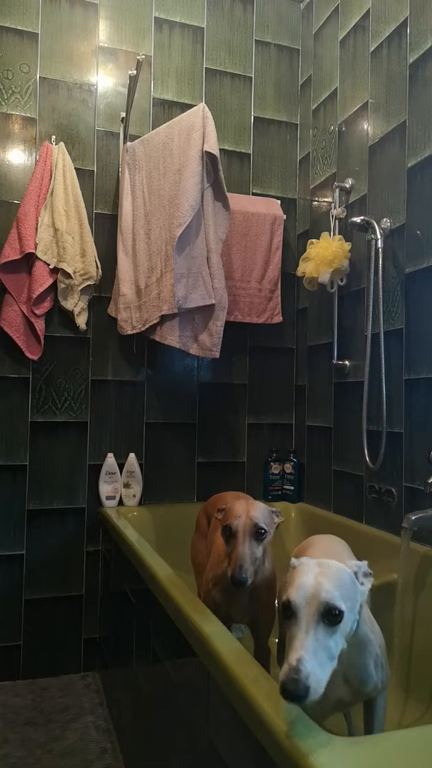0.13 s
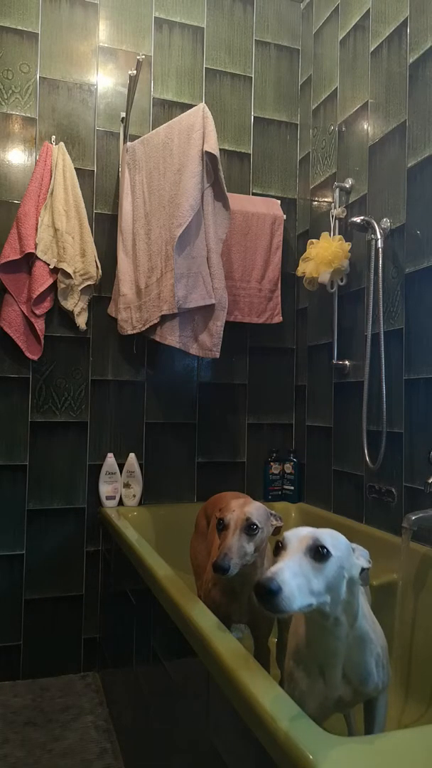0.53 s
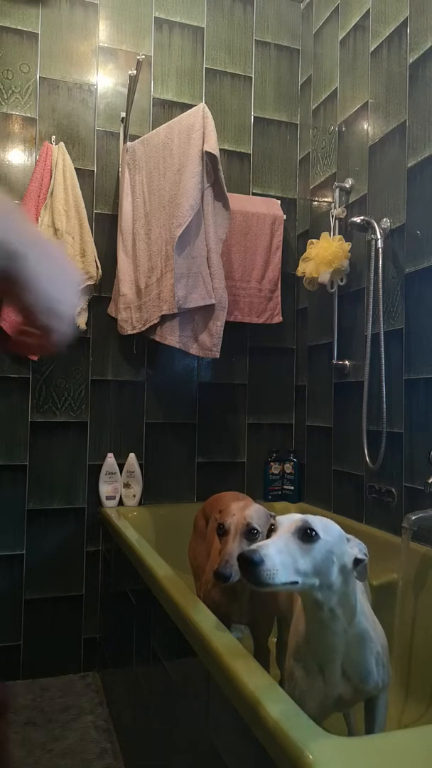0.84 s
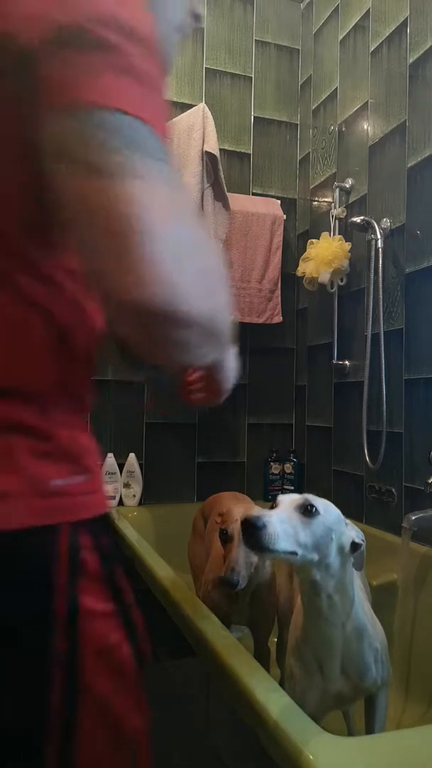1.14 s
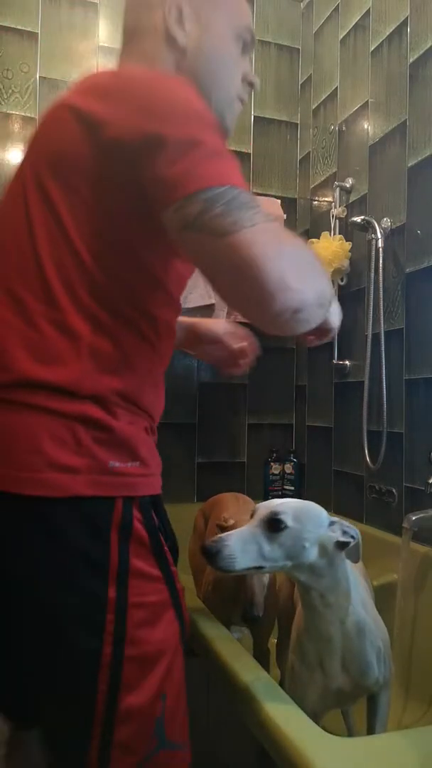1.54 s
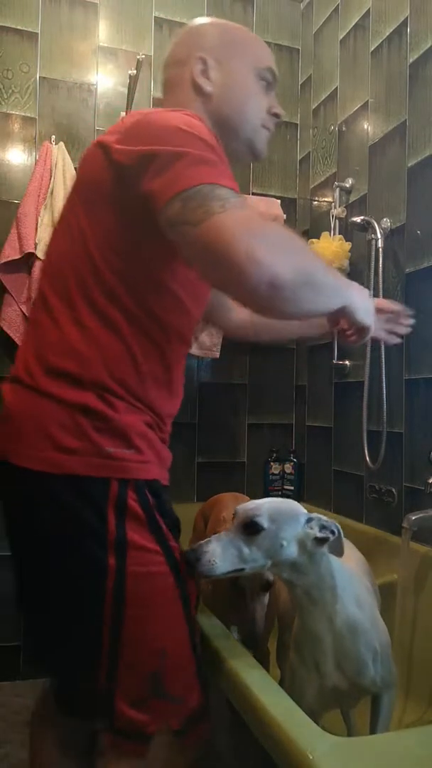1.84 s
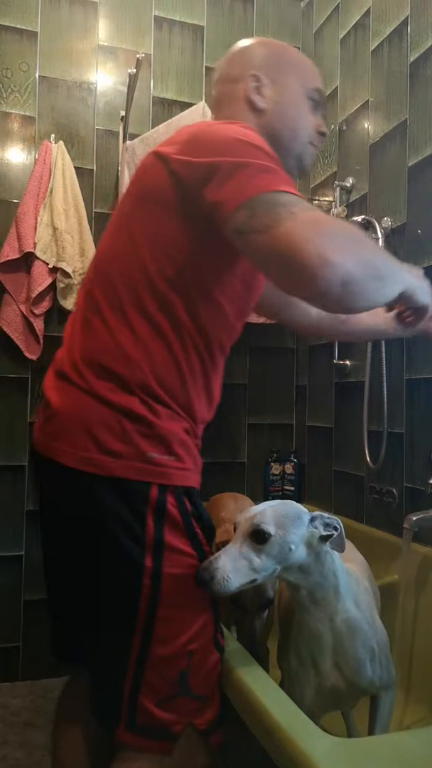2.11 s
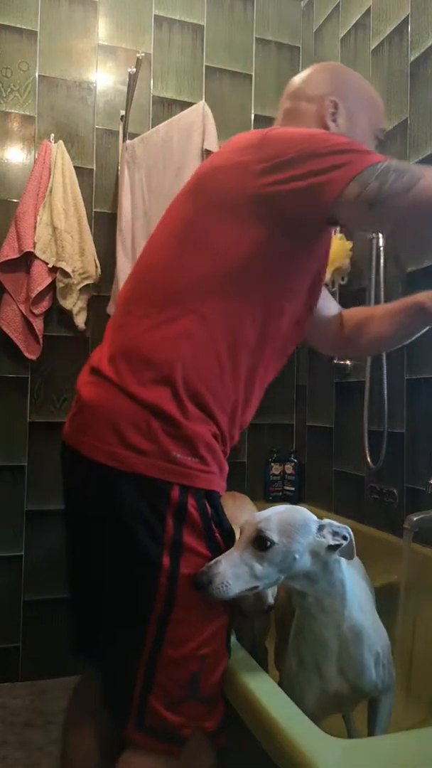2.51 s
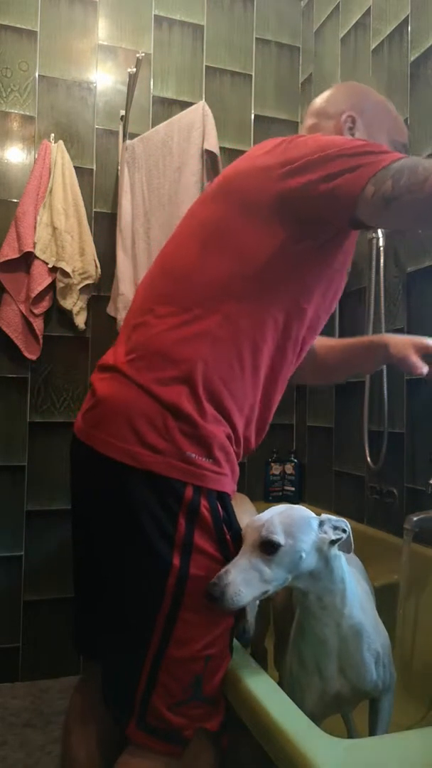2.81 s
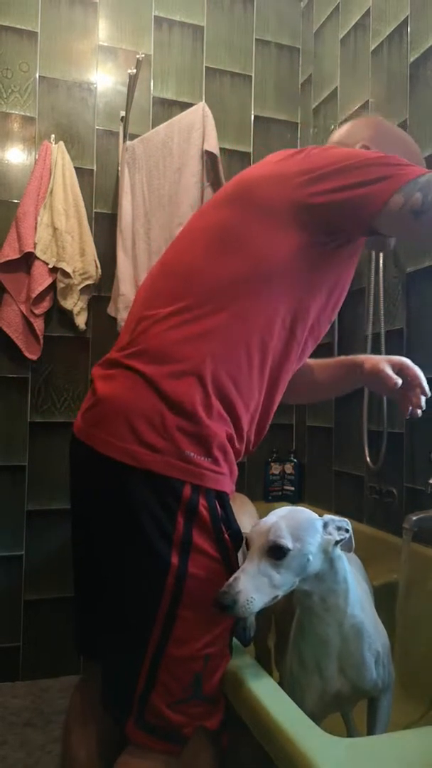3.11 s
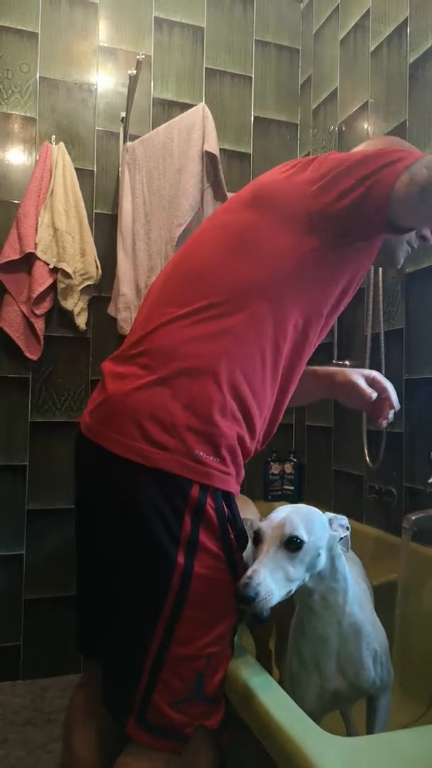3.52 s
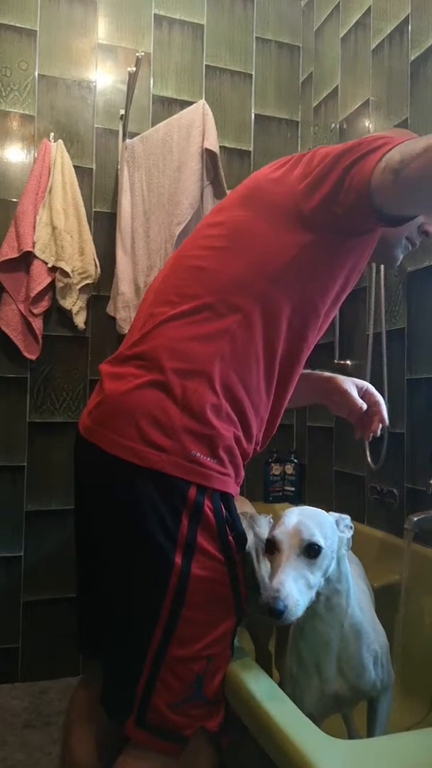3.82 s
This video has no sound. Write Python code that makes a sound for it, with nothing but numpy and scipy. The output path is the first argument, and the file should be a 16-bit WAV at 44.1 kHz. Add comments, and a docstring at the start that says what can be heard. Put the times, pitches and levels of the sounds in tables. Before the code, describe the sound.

A broken stream of tap water splashes into a tub throughout, crackling with bright droplets and uneven slaps, a soft low rumble beneath; short hard-tiled room reflections, heard nearby on a phone's stereo microphones.

```python
"""Tap running into a bathtub

Small tiled bathroom. The broken stream hisses (shaped noise), churns the pool (noise following
a level curve) and drums the tub's low modes (resonant noise). Slaps, spatters, sharp clicks and
stray drops are damped sines rising in pitch, singly or in crowds, coloured by the tub wall. The
tiles answer with decaying noise; a faint low hum lies beneath. A phone's two ports hear it.
"""
import sys
import numpy as np
from scipy import signal
from scipy.fft import rfft, irfft, next_fast_len
from scipy.io import wavfile
from scipy.ndimage import uniform_filter1d, map_coordinates

SR = 44100
rng = np.random.default_rng(int(sys.argv[2]) if len(sys.argv) > 2 else 0)


def natural_amplitude(level_db):
    """Convert a level in decibels to a linear amplitude factor, elementwise."""
    exponent = np.asarray(level_db, float) / 20
    return 10 ** exponent


def wav_record(signal):
    """Record a signal, one row per channel, as 16-bit PCM in the file named by sys.argv[1]."""
    frames = np.transpose(np.atleast_2d(signal))
    bounded = np.clip(frames, -1, 1)
    # unit amplitude maps onto the largest positive 16-bit level
    quanta = np.round(bounded * 32767).astype(np.int16)
    wavfile.write(sys.argv[1], SR, quanta)


N = 174195

# Levels in the source tables are before each layer's trim; spectra set shape only.
# spray off the stream: (time [s], level [dB])
SPRAY_LEVEL = [(0.0, -40.5), (0.3, -40.5), (0.62, -43.5), (0.85, -41.5), (1.34, -42.5), (1.5, -42.5),
               (2.13, -43.5), (2.28, -42), (2.8, -44), (2.93, -44), (3.72, -42.5), (3.95, -42)]
# churning of the pool: (time [s], level [dB])
CHURN_LEVEL = [(0.0, -48.5), (0.01, -54), (0.16, -50.5), (0.21, -45.5), (0.25, -49), (0.32, -51.5),
               (0.4, -54), (0.45, -47), (0.52, -51), (0.73, -51), (0.8, -53.5), (0.84, -51), (1.05, -52.5),
               (1.17, -59), (1.31, -56.5), (1.34, -57), (1.43, -50), (1.48, -55), (1.51, -44.5),
               (1.56, -52), (1.58, -46.5), (1.64, -47), (1.66, -52), (1.72, -46), (1.79, -49),
               (1.99, -52.5), (2.01, -48.5), (2.25, -51.5), (2.29, -62), (2.49, -55), (2.54, -53),
               (2.6, -60.5), (2.71, -62.5), (2.78, -54), (2.79, -55.5), (2.91, -49), (2.935, -47.5),
               (3.0, -52.5), (3.12, -52), (3.13, -56), (3.27, -47.5), (3.6, -54), (3.65, -49),
               (3.84, -55.5), (3.93, -51), (3.95, -52)]
# push of the stream on the tub floor: (time [s], level [dB])
DRUM_LEVEL = [(0.0, -38.5), (0.05, -45), (1.61, -45), (1.65, -54), (1.73, -41), (2.36, -50.5),
              (2.54, -41.5), (2.78, -54), (2.79, -46.5), (3.41, -38), (3.5, -45), (3.53, -36.5),
              (3.85, -42.5), (3.95, -45)]
# slaps on the pool: (time [s], level [dB], centre pitch [Hz], left-right [dB], length scale [s])
SLAPS = [(0.05, -28.5, 2630, 2, 0.02), (0.139, -29, 3660, 5, 0.015), (0.172, -29, 2400, -7, 0.048),
         (0.251, -33, 1750, -5, 0.018), (0.304, -27.5, 1860, -0.5, 0.021), (0.341, -32, 2300, 0, 0.019),
         (0.4455, -27, 2800, 3, 0.04), (0.507, -24, 3580, 0, 0.0062), (0.801, -28, 3870, 3, 0.017),
         (0.963, -27, 4360, 2, 0.021), (1.134, -28, 4660, 1, 0.022), (1.3356, -25, 3210, 1.0, 0.04),
         (1.376, -26.5, 4020, 4, 0.022), (1.4065, -21.5, 3850, 1.5, 0.019), (1.4394, -32, 4220, -2, 0.018),
         (1.485, -24.5, 5100, 2, 0.025), (1.57, -31.5, 2400, -2, 0.018), (1.6801, -34, 1700, 2, 0.021),
         (1.732, -36.5, 2210, -5, 0.016), (1.791, -23.5, 4550, 0, 0.033), (1.8248, -28.5, 1860, -1, 0.02),
         (1.925, -23, 2510, -2, 0.019), (1.9566, -23, 3440, 2, 0.02), (1.997, -30.5, 1880, -4, 0.025),
         (2.0777, -33.5, 2360, 3, 0.024), (2.1245, -24, 4000, 1, 0.014), (2.253, -30, 4270, 3, 0.022),
         (2.291, -35.5, 3440, 2, 0.025), (2.523, -22.5, 2320, -3.5, 0.032), (2.567, -43, 2300, 3, 0.026),
         (2.7864, -24.5, 2000, -4, 0.018), (2.9265, -22.5, 2070, 0, 0.023), (3.03, -31.5, 2210, -1, 0.019),
         (3.0894, -25.5, 3680, -2, 0.017), (3.178, -36, 2330, 5, 0.026), (3.212, -24.5, 4070, -0.5, 0.018),
         (3.258, -28, 1880, -6, 0.017), (3.3043, -24, 2400, -0.5, 0.02), (3.655, -29, 4600, 3, 0.035),
         (3.705, -22.5, 3270, 0, 0.021), (3.7453, -22, 2840, 4, 0.019), (3.941, -25, 2400, 6, 0.03)]
# spatters of fine drops: (time [s], level [dB], centre pitch [Hz], left-right [dB], length scale [s])
SPATTERS = [(0.3044, -21, 6350, -3.0, 0.023), (0.41, -27.5, 9100, -4, 0.038),
            (0.565, -23.5, 7600, 6, 0.018), (0.791, -29, 7800, -3, 0.025), (0.87, -25, 7540, 2, 0.036),
            (0.974, -25.5, 9300, 2, 0.012), (1.315, -28, 6900, 1, 0.024), (1.37, -27, 7600, 11, 0.035),
            (1.407, -24, 7100, 1, 0.029), (1.4972, -32, 8100, 12, 0.02), (1.618, -28, 9400, 4, 0.019),
            (1.791, -25.5, 7550, 10, 0.023), (1.922, -29, 8650, 0, 0.017), (2.054, -24.5, 7400, 9, 0.019),
            (2.099, -19, 6200, 1.5, 0.016), (2.438, -24.5, 6400, -1, 0.028), (2.498, -28, 5640, 1, 0.047),
            (2.6019, -25.5, 7500, 3, 0.015), (2.7871, -25, 5720, 1, 0.015), (2.837, -31, 6900, 0, 0.023),
            (2.907, -27, 7300, 4, 0.022), (3.022, -26, 8550, 7, 0.019), (3.068, -24, 5600, -3, 0.03),
            (3.206, -27, 7600, 1, 0.023), (3.49, -21, 7860, 3, 0.046), (3.71, -24.5, 7800, 6, 0.029),
            (3.852, -32, 7700, 7, 0.045)]
# sharp broad ticks, some alone, some at the onset of a slap or spatter: (time [s], peak [dB], pitch [Hz])
CLICKS = [(0.0165, -18, 9000), (0.0545, -18.5, 3500), (0.3148, -19, 8550), (0.9838, -24, 10000),
          (1.321, -23, 7000), (1.382, -26, 4200), (1.4118, -24, 9000), (1.491, -24, 6000),
          (1.7909, -24, 11000), (2.2065, -17, 9000), (2.7403, -25, 9000), (2.7873, -26.5, 2200),
          (2.9055, -22, 5960), (2.9273, -17, 1960), (3.032, -25, 11000), (3.2107, -30, 10000)]
# spray spectrum: (frequency [Hz], relative density [dB per Hz])
SPRAY_SPECTRUM = [(1760, -12.5), (3000, -28), (3980, -10), (5790, 3.5), (6240, -0.5), (7570, 0.5),
                  (8430, -1), (9140, 1.5), (11100, -3), (13300, -13.5), (14900, -20.5)]
# pool spectrum: (frequency [Hz], relative density [dB per Hz])
POOL_SPECTRUM = [(130, -7.5), (220, -4), (301, -12), (434, -10), (556, -12), (686, -7), (761, -6.5),
                 (2310, -13.5), (3400, -11), (5000, -9), (6500, -66), (11000, -120)]
# rumble spectrum: (frequency [Hz], relative density [dB per Hz])
RUMBLE_SPECTRUM = [(12, -37), (20, -6), (43, -1), (102, 12.5), (182, 3), (204, -9), (300, -30.5),
                   (390, -62), (660, -120)]
# low modes of the tub: (centre [Hz], width [Hz], relative level [dB])
TUB_MODES = [(95.7, 31.4, -6.5), (127.7, 10.1, 0.5), (175.9, 10.6, 3), (205.2, 10.1, -3), (460, 95, -22.5)]
# ring of the enamel wall: (centre [Hz], width [Hz], boost [dB])
TUB_WALL = (2274, 114, 2.1)
# decay of the tiled room: (frequency [Hz], t60 [s])
TILE_DECAY = [(300, 0.2), (2000, 0.26), (6000, 0.12), (12000, 0.12)]
# likeness of the two ports' noise, lag aside: (frequency [Hz], correlation [-1..1])
PORT_LIKENESS = [(60, 1), (250, 0.95), (450, 0.83), (750, 0.67), (1300, 0.23), (2500, 0.16), (14000, 0.1)]
# balance of the two ports: (frequency [Hz], left-right [dB])
PORT_LEAN = [(200, 0), (370, 0.5), (690, -3), (1260, -4), (2320, -2.5), (4280, 0.5), (7870, -5.5),
             (14500, -14)]
# resonances of the left port: (centre [Hz], width [Hz], boost [dB])
LEFT_PORT = [(2400, 550, 4), (5800, 130, 6.5), (7600, 1230, 7.5)]
# resonances of the right port: (centre [Hz], width [Hz], boost [dB])
RIGHT_PORT = [(2350, 136, 5.5), (9170, 330, 3), (10910, 390, 5)]

LEFT_LAG_MAX_S = 0.00062  # the tub is nearer the right port
BASS_LAG_SHARE, LAG_TURN_HZ = 0.36, 504  # the bass wraps round the phone with less lag


def unit(x):
    """Scale to rms 1."""
    return x / np.sqrt(np.mean(x ** 2) + 1e-20)


def along(points, hz):
    """Read (Hz, value) points on a log-frequency axis."""
    point_hz, value = np.transpose(points)
    return np.interp(np.log(hz + 1), np.log(point_hz + 1), value)


def curve(points):
    """Interpolate (s, value) points to one value per sample."""
    time_s, value = np.transpose(points)
    return np.interp(np.arange(N) / SR, time_s, value)


def wobble(knots_per_s):
    """Smooth random curve through Gaussian knots."""
    knots = rng.standard_normal(int(N * knots_per_s / SR) + 4)
    return map_coordinates(knots, [np.arange(N) * knots_per_s / SR])


def filtered(x, response):
    """Multiply the spectrum of x by a function of frequency."""
    size = next_fast_len(N + SR // 2)
    return irfft(rfft(x, size) * response(np.fft.rfftfreq(size, 1 / SR)), size)[..., :N]


def rush(gain, patchy_db):
    """Stereo noise of rms 1, patchy in time and frequency, partly alike and lagged between ports."""
    z = signal.stft(rng.standard_normal((2, N + 512)), nperseg=512)[2]
    patches = uniform_filter1d(rng.standard_normal(z.shape[1:]), size=8, axis=0)
    patches = uniform_filter1d(patches, size=9, axis=1)
    pair = signal.istft(z * natural_amplitude(patchy_db * unit(patches)), nperseg=512)[1][:, :N]

    def mid_side_gain(hz):
        # cos^2 - sin^2 of this angle is the likeness
        angle = np.arccos(np.clip(along(PORT_LIKENESS, hz), -1, 1)) / 2
        return gain(hz) * np.array([np.cos(angle), np.sin(angle)])

    def port_lag(hz):
        share = 1 - (1 - BASS_LAG_SHARE) / (1 + (hz / LAG_TURN_HZ) ** 4)
        return np.exp(-2j * np.pi * hz * np.array([[LEFT_LAG_MAX_S], [0]]) * share)

    mid, side = filtered(pair, mid_side_gain)
    return unit(filtered(np.array([mid + side, mid - side]), port_lag))


def bubbles(start_s, hz, db, pan_db, cycles, rise):
    """Soft-starting damped sines rising in pitch, each with its own lag; cycles = onset to peak."""
    t = np.arange(320) / SR
    age = t * hz[:, None] / cycles
    tone = np.sin(2 * np.pi * hz[:, None] * t * (1 + rise * age / 2))
    ring = tone * age * np.exp(1 - age) * np.hanning(640)[320:]
    left_lag = (LEFT_LAG_MAX_S * SR * rng.random(len(start_s)) ** 0.3).astype(int)
    start = (start_s * SR).astype(int)
    ports = []
    for sign, lag in ((1, left_lag), (-1, 0)):
        at = np.clip(start + lag, 0, N)[:, None] + np.arange(320)
        level = natural_amplitude(db + sign * pan_db / 2)[:, None]
        ports.append(np.bincount(at.ravel(), (ring * level).ravel(), N + 400)[:N])
    return np.array(ports)


def bursts(events, spread, fade_db, gain_db, cycles, count):
    """Each event frees a thinning crowd of bubbles; pitch spread (given at 4 kHz) grows with pitch."""
    start_s, db, hz, pan_db, length_s = np.transpose(events)[:, :, None]
    u, size, g = np.moveaxis(rng.random((len(events), count, 3)), 2, 0)
    late = (-np.log(u)) ** 0.8  # delay in length scales
    deviate = np.log(g / (1 - g)) / 2
    pitch_hz = np.clip(hz * np.exp(spread * hz / 4000 * deviate), 500, 11000)
    level_db = db + gain_db - fade_db * late - 14 * size
    time_s = start_s + length_s * late
    pan_db = pan_db + 0 * u  # one per bubble
    return bubbles(time_s.ravel(), pitch_hz.ravel(), level_db.ravel(), pan_db.ravel(), cycles, rise=0.064)


def patter(level_db, centre_hz, spread, size_db, cycles, count):
    """Stray drops at random moments, some larger than the rest."""
    time_s = rng.random(count) * N / SR
    hz = np.clip(centre_hz * np.exp(spread * rng.standard_normal(count)), 500, 11000)
    db = level_db[(time_s * SR).astype(int)] + size_db * rng.random(count) ** 3
    return bubbles(time_s, hz, db, 3 * rng.standard_normal(count), cycles, rise=0.083)


def spray():
    """Hiss of the broken stream; its level partly follows the churning."""
    churn_db = curve(CHURN_LEVEL)
    follow_db = 0.27 * (churn_db - churn_db.mean())
    level_db = curve(SPRAY_LEVEL) + 0.4 + 1.43 * wobble(13) + follow_db
    return natural_amplitude(level_db) * rush(lambda hz: natural_amplitude(along(SPRAY_SPECTRUM, hz)), patchy_db=1.37)


def pool():
    """Wash of the churning pool."""
    level_db = curve(CHURN_LEVEL) + 6.0 + 0.25 * wobble(17)
    return natural_amplitude(level_db) * rush(lambda hz: natural_amplitude(along(POOL_SPECTRUM, hz)), patchy_db=2.0)


def drumming():
    """The stream's push excites the tub's low modes, over a rumble of constant mean level."""
    def modes(f):
        return np.sqrt(sum(natural_amplitude(2 * db) / (1 + ((f - hz) / width_hz * 2) ** 4)
                           for hz, width_hz, db in TUB_MODES))

    push_db = curve(DRUM_LEVEL)
    drum = natural_amplitude(push_db - 1.4) * rush(modes, patchy_db=0.5)
    rumble_noise = rush(lambda hz: natural_amplitude(along(RUMBLE_SPECTRUM, hz)), patchy_db=0.4)
    return drum + natural_amplitude(push_db.mean() - 7.5) * rumble_noise


def slaps():
    """Bursts of bubbles as water slaps the pool, with short broad crackle."""
    body = bursts(SLAPS, spread=0.27, fade_db=6.0, gain_db=-5.5, cycles=2.32, count=40)
    crackle = bursts(SLAPS, spread=1.1, fade_db=-0.5, gain_db=-16, cycles=0.61, count=40)
    return body + crackle


def spatters():
    """Crowds of fine drops, with shorter ticks."""
    body = bursts(SPATTERS, spread=0.11, fade_db=1.0, gain_db=-7.5, cycles=2.5, count=60)
    ticks = bursts(SPATTERS, spread=0.28, fade_db=6, gain_db=-9.5, cycles=0.73, count=10)
    return body + ticks


def clicks():
    """Sharp broad ticks of one or two cycles, some alone, some at the onset of a slap or spatter."""
    time_s, db, hz = np.transpose(CLICKS)
    return bubbles(time_s, hz, db, 0 * time_s, cycles=0.57, rise=0.085)


def stray_drops():
    """Fine patter following the spray level, coarse patter following the churning."""
    fine_db = curve(SPRAY_LEVEL) - 3 + 0.71 * wobble(7.06)
    coarse_db = curve(CHURN_LEVEL) + 2.0 + 3.54 * wobble(9.65)
    fine = patter(fine_db, centre_hz=7600, spread=0.267, size_db=11.0, cycles=2.52, count=3000)
    coarse = patter(coarse_db, centre_hz=2180, spread=0.3, size_db=10.5, cycles=1.16, count=1600)
    return fine + coarse


def tub_wall(f):
    """Response of the enamel wall, ringing with every splash: one resonant boost."""
    hz, width_hz, boost_db = TUB_WALL
    resonance = 1j * f * width_hz / (hz * hz - f * f + 1j * f * width_hz)
    return 1 + (natural_amplitude(boost_db) - 1) * resonance


def drop_rolloff(f):
    """Even the smallest drops fade above 12 kHz."""
    return 1 / np.sqrt(1 + (f / 12000) ** 12)


def tiles(x):
    """Room answer, 130 samples late: noise whose frequencies each die at their own speed."""
    hz, t, z = signal.stft(rng.standard_normal((2, SR // 2)), SR, nperseg=256)
    decay = natural_amplitude(-60 * t / along(TILE_DECAY, hz)[:, None])
    tail = signal.istft(z * decay, SR, nperseg=256)[1]
    late = np.pad(x, ((0, 0), (130, 0)))
    return signal.fftconvolve(late, tail / np.linalg.norm(tail[0]), axes=1)[:, :N]


def room_modes(f):
    """The hard small room lifts and drops narrow bands above 400 Hz, less with rising frequency."""
    ripple = map_coordinates(rng.standard_normal(int(SR / 10)), [f / 14])  # one knot per 14 Hz
    depth_db = 2 * (f > 400) * (1000 / (f + 1)) ** 0.29
    return natural_amplitude(depth_db * ripple)


def hum():
    """One faint low tone, alike at both ports, its level wandering."""
    return natural_amplitude(-60 + 2.5 * wobble(3.6)) * np.sin(2 * np.pi * 48.6 * np.arange(N) / SR)


def scene():
    """Splashes ring in the tiles over the wash, drumming and hum."""
    wash = filtered(spray() + pool() + drumming(), room_modes)
    splashes = filtered(slaps() + spatters() + clicks() + stray_drops(), tub_wall)
    drops = filtered(splashes, drop_rolloff)
    return drops + natural_amplitude(-1) * tiles(drops) + wash + hum()


def band_limit(x):
    """A steep low-pass at the top of the band."""
    return signal.sosfilt(signal.butter(12, 15070, fs=SR, output="sos"), x)


def record(dry):
    """Each port has its own lean and resonances."""
    def boost_db(port, f):
        return sum(db / (1 + ((f - hz) / width_hz * 2) ** 2) for hz, width_hz, db in port)

    def ports(f):
        half_lean_db = along(PORT_LEAN, f) / 2
        return natural_amplitude([boost_db(LEFT_PORT, f) + half_lean_db, boost_db(RIGHT_PORT, f) - half_lean_db])

    mix = filtered(dry, ports)
    return band_limit(mix)


dry = scene()
out = record(dry)
wav_record(out)
```